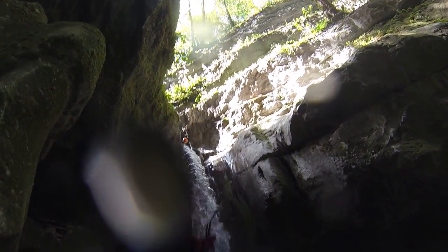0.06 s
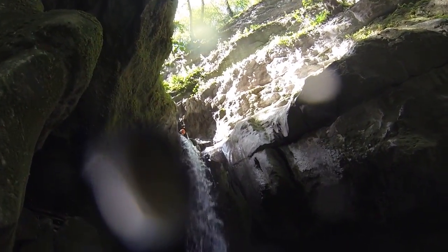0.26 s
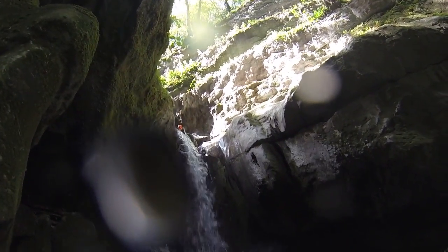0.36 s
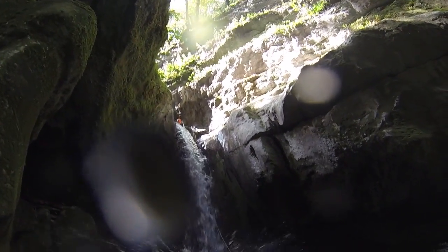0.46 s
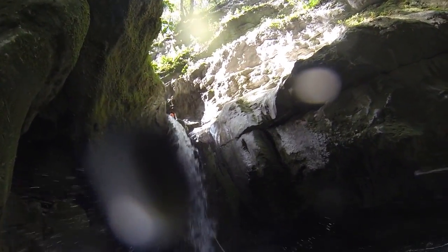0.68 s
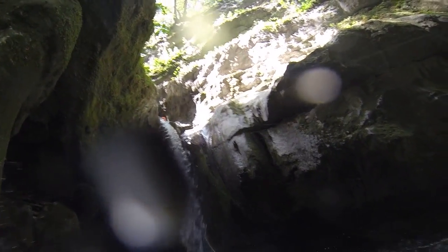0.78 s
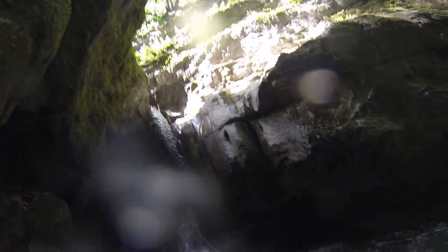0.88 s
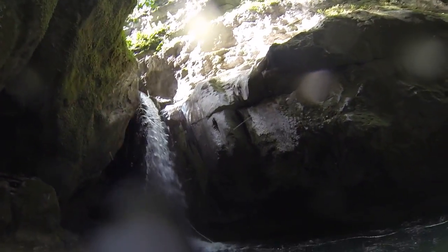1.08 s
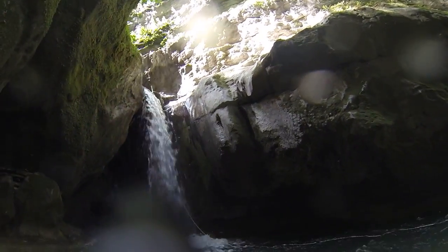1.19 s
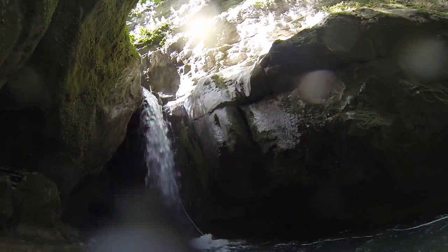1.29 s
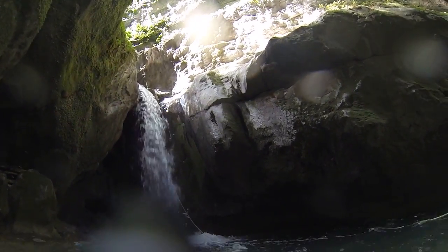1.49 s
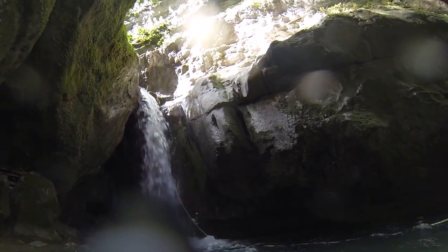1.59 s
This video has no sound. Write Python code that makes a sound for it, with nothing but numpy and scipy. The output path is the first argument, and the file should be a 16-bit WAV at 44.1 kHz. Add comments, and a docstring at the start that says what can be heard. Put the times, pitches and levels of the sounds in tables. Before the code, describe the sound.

A waterfall rushes steadily into a pool in a rocky canyon, heard through a waterproof camera case. Water sloshes close by, then drops tap the case and it briefly knocks and rattles over a low handling rumble.

```python
"""Canyon waterfall, wet camera

A waterfall pours into a pool in a rocky canyon. The microphone is a wet camera's, inside a waterproof
case whose resonances colour the water. Water sloshes close by and drops tap the case; once the case is
knocked and rattles. Moving the camera adds a low rumble and makes its mount drone."""
import sys
import numpy as np
from scipy import signal
from scipy.fft import rfft, irfft
from scipy.io import wavfile
from scipy.ndimage import uniform_filter1d

SR = 44100
rng = np.random.default_rng(int(sys.argv[2]) if len(sys.argv) > 2 else 0)


def int16_out(signal):
    """Quantize to a 16-bit WAV file."""
    q = np.round(np.clip(np.atleast_2d(signal).T, -1, 1) * 32767)
    wavfile.write(sys.argv[1], SR, q.astype(np.int16))


N = 72765
TIME = np.arange(N) / SR

# spectrum of the fall: frequency_hz, relative_db
FALL_SPECTRUM = [(60, -4), (180, -4), (330, -3.5), (500, -4), (700, -7), (900, -5), (1250, -3.7),
                 (2200, -1.73), (3400, -5.5), (4200, -12.5), (5600, -22.5), (7300, -24.5), (10500, -27.5),
                 (13000, -30.5), (15000, -40)]
# level of the fall as the camera turns: time_s, gain_db
FALL_GAIN = [(0, -.5), (.45, 0), (.65, -0.5), (.77, -2.5), (.85, 1.5), (1.0, 0.5), (1.2, -0.66),
             (1.65, -.5)]
# resonances of the case around the microphone: centre_hz, width_hz, boost_db
CASE_RESONANCES = [(340, 77, 4), (1101, 163, 7), (1406, 96, 5), (1774, 250, 5.5), (2650, 174, 3),
                   (4710, 530, 6), (6100, 640, 6.5), (9300, 1080, 4.5), (11430, 610, 5.5)]
# sloshes close by: crest_s, level_db, rise_s, fade_s
SLOSH_CRESTS = [(0.237, -19, 0.015, 0.017), (0.262, -25, 0.019, 0.05), (0.688, -25.5, 0.0025, 0.0059),
                (.94, -33.5, 0.027, 0.015)]
# spectrum of a slosh: frequency_hz, relative_db
SLOSH_SPECTRUM = [(80, -14), (200, 1), (400, -4), (750, -7), (1150, -1), (2000, -6.5), (3000, -9.5),
                  (4500, -27.5), (8000, -37.5), (15000, -44)]
# drops and light ticks on the case: start_s, level_db, pitch_hz, half_rise_s
CASE_TAPS = [(0.5059, -5, 1394, 0.00043), (0.6456, -19.5, 1510, 0.00034), (0.6584, -13.5, 1460, 0.00071),
             (0.6654, -8, 1484, 0.00076), (0.706, -13, 1620, 0.00028), (0.735, -21, 1500, 0.00042),
             (.8833, -20, 1625, 0.0007), (.9230, -26, 1150, 0.00034), (.9430, -27, 910, 0.00042),
             (.9895, -23, 1570, 0.00064), (1.2119, -25.5, 1700, 0.00051)]
# spectrum of the water a tap scatters: frequency_hz, relative_db
SPLAT_SPECTRUM = [(100, -50), (500, 8), (800, -14), (1100, 0), (2000, 0), (3200, -11), (5000, -36),
                  (8000, -37), (15000, -42)]
# modes of the case wall, rung by a tap: pitch_hz, relative_db, t60_s
WALL_MODES = [(620, -16.5, 0.048), (1087, -6.5, 0.032), (1820, -29, 0.018), (2820, -31, .008)]
# hard clicks of the fittings: start_s, level_db, pitch_hz, half_rise_s
FITTING_CLICKS = [(0.6456, -23, 3250, .00013), (.6580, -27, 4350, 0.00013), (.6650, -25.5, 3420, 0.00056),
                  (.7055, -18.5, 3640, 0.00023), (.8220, -36, 9000, 0.000074), (.9900, -33, 5000, .0003),
                  (1.616, -31, 3200, 0.00012)]
# knocks on the case: start_s, gain_db, contact_s, pitch_ratio
CASE_KNOCKS = [(0.592, -25, 0.0023, 0.93), (0.6587, -12, 0.00067, 1.102), (0.6645, -8, 0.0006, 0.991),
               (0.6726, -16, .0011, 0.88), (0.691, -13, 0.0019, 0.615), (0.7331, -30, 0.001, 0.88),
               (0.864, -30, 0.0016, 0.76)]
# modes of the whole case, rung by a knock: base_pitch_hz, relative_db, t60_s
BODY_MODES = [(172, -28, 0.082), (279, -11.5, .07), (335, -28, 0.025), (498, -5.5, 0.044), (563, 1, 0.042),
              (746, -5, 0.033), (825, -8.5, 0.0068)]
# handling noise as the camera moves: time_s, rumble_db, drone_db
HANDLING_LEVELS = [(0, -36.5, -46), (.32, -28.5, -36), (.5, -29, -57.5), (.6, -32, -26), (.66, -25.5, -59),
                   (.76, -30, -37.5), (.826, -22, -46.5), (.936, -30, -35), (1.088, -25.5, -36),
                   (1.166, -36, -40.5), (1.322, -26.5, -47), (1.65, -40, -40)]
# spectrum of the camera's rumble: frequency_hz, relative_db
RUMBLE_SPECTRUM = [(5, -17), (15, -4), (26, 3), (33, -2.5), (50, -21.5), (120, -33), (400, -84)]
# spectrum of the mount's drone: frequency_hz, relative_db
DRONE_SPECTRUM = [(30, -16), (65, -10), (90, -0.5), (115, -13), (160, -24), (500, -58)]


def amp(db):
    """Decibels to gain."""
    return 10 ** (np.asarray(db) / 20)


def unit_rms(x):
    """Scales to rms 1."""
    return x / np.sqrt(np.mean(x ** 2) + 1e-20)


def add(mix, start_s, sound):
    """Mixes a sound in at a time."""
    part = mix[round(start_s * SR):][:len(sound)]
    part += sound[:len(part)]


def coloured(x, spectrum, resonances=()):
    """Gives a sound a spectrum and resonant bumps, at rms 1."""
    hz = np.fft.rfftfreq(N, 1 / SR)
    points_hz, points_db = np.transpose(spectrum)
    curve_db = np.interp(np.log(hz + 1), np.log(points_hz), points_db)
    bumps_db = sum(boost * np.exp(-2 * ((hz - centre) / width) ** 2)
                   for centre, width, boost in resonances)
    return unit_rms(irfft(rfft(x) * amp(curve_db + bumps_db), N))


def ring(modes):
    """Decaying modes after one blow."""
    t = TIME[:SR // 2]
    return sum(amp(db - 60 * t / t60) * np.sin(2 * np.pi * hz * t) for hz, db, t60 in modes)


def pip(hz, half_rise_s):
    """A few cycles that swell and die at once."""
    t = TIME[:SR // 2]
    age = t / (2 * half_rise_s)
    return age ** 2 * np.exp(2 * (1 - age)) * np.sin(2 * np.pi * hz * t)


def waterfall(patch_db=1.65, flicker_db=0.48, drops_per_s=900):
    """The fall hits the pool: a roar with drifting patches, and the patter of separate drops landing."""
    frames = signal.stft(rng.standard_normal(N), nperseg=256, noverlap=192)[2].T  # time by frequency
    drift = uniform_filter1d(rng.standard_normal(frames.shape), size=30, axis=0)
    patches = unit_rms(uniform_filter1d(drift, size=5, axis=1))
    flicker = unit_rms(uniform_filter1d(rng.standard_normal(len(frames)), size=6))[:, None]
    frames = frames * amp(patch_db * patches + flicker_db * flicker)
    churn = signal.istft(frames.T, nperseg=256, noverlap=192)[1][:N]
    roar = amp(-34.5) * coloured(churn, FALL_SPECTRUM, CASE_RESONANCES)
    drop_db = 2 * np.minimum(rng.exponential(1, N), 4.5)  # many small drops, few large
    landings = rng.random(N) < drops_per_s / SR
    drops = landings * amp(drop_db) * rng.choice([-1, 1], N)
    patter = amp(-43) * coloured(drops, FALL_SPECTRUM, CASE_RESONANCES)
    return (roar + patter) * amp(np.interp(TIME, *np.transpose(FALL_GAIN)))


def sloshes(grain=0.22):
    """Water close to the microphone builds to a crest in a grainy rush and drains away."""
    power = np.zeros(N)
    for crest_s, db, rise_s, fade_s in SLOSH_CRESTS:
        t = TIME - crest_s
        power += (amp(db) * np.exp(np.where(t < 0, t / rise_s, -t / fade_s))) ** 2
    clumps = np.exp(grain * unit_rms(uniform_filter1d(rng.standard_normal(N), size=80)))
    return np.sqrt(power) * coloured(rng.standard_normal(N) * clumps, SLOSH_SPECTRUM, CASE_RESONANCES)


def drop_taps(splat_fade_s=0.0041, wall_rise_s=0.0067):
    """Drops land right at the microphone: each hollow tap splats and rings the wall of the case."""
    out = np.zeros(N)
    splat_fade = np.exp(-TIME / splat_fade_s)
    wall = ring(WALL_MODES) * (1 - np.exp(-TIME[:SR // 2] / wall_rise_s))
    for start_s, db, hz, half_rise_s in CASE_TAPS:
        burst = np.zeros(N)
        add(burst, start_s, rng.standard_normal(N) * splat_fade)
        splat = burst.std() * coloured(burst, SPLAT_SPECTRUM, CASE_RESONANCES)
        out += amp(-23 + 0.27 * db) * splat  # a harder tap scatters only a little more water
        add(out, start_s, amp(db) * (pip(hz, half_rise_s) + wall))
    return out


def case_knocks():
    """Bumps ring the wet case; the main blow rebounds, each time lower and duller."""
    out = np.zeros(N)
    for start_s, db, contact_s, pitch_ratio in CASE_KNOCKS:
        push = np.sin(np.pi * np.minimum(TIME[:SR // 100] / contact_s, 1))  # longer contact is duller
        body = ring([(hz * pitch_ratio, mode_db, t60) for hz, mode_db, t60 in BODY_MODES])
        add(out, start_s, amp(db) * signal.fftconvolve(body, push / push.sum()))
    return out


def mount_swing(start_s=0.668, pitch_hz=91.8, level_db=-12.5, t60_s=0.2):
    """The mount swings in one low mode after the heaviest knock."""
    out = np.zeros(N)
    add(out, start_s, ring([(pitch_hz, level_db, t60_s)]))
    return out


def fitting_clicks():
    """The hard fittings of the case give short, bright clicks."""
    out = np.zeros(N)
    for start_s, db, hz, half_rise_s in FITTING_CLICKS:
        add(out, start_s, amp(db) * pip(hz, half_rise_s))
    return out


def handling():
    """Underneath the water, the moving camera rumbles and its mount drones."""
    time_s, rumble_db, drone_db = np.transpose(HANDLING_LEVELS)
    rumble = amp(np.interp(TIME, time_s, rumble_db)) * coloured(rng.standard_normal(N), RUMBLE_SPECTRUM)
    drone = amp(np.interp(TIME, time_s, drone_db)) * coloured(rng.standard_normal(N), DRONE_SPECTRUM)
    return rumble + drone


def scene():
    """Water and camera noises at one microphone, in mono."""
    water = waterfall() + sloshes() + drop_taps()
    camera = case_knocks() + mount_swing() + fitting_clicks() + handling()
    return (water + camera)[None]


def record(dry, cutoff_hz=15200):
    """The camera cuts off the highest treble."""
    lowpass = signal.firwin(511, cutoff_hz, window=("kaiser", 9), fs=SR)
    return signal.oaconvolve(dry, lowpass[None], "same")


dry = scene()
out = record(dry)
int16_out(out)
```